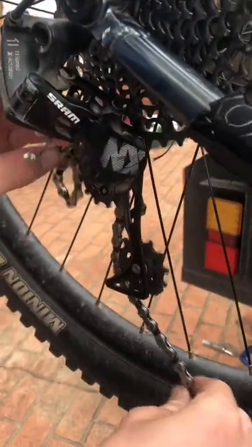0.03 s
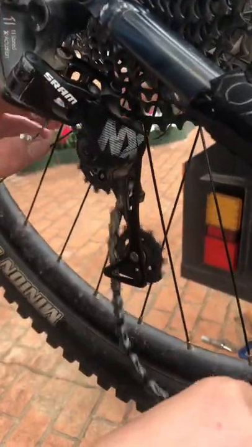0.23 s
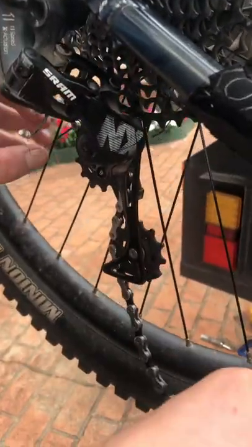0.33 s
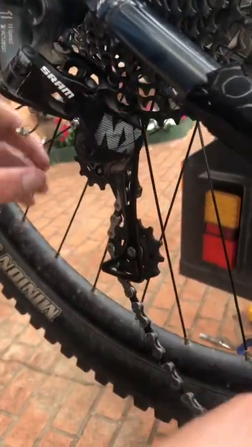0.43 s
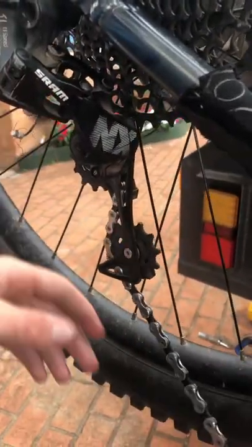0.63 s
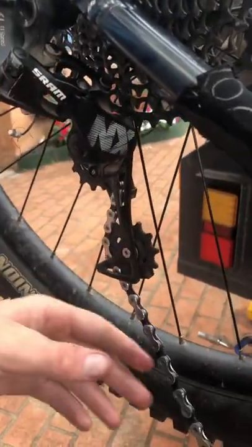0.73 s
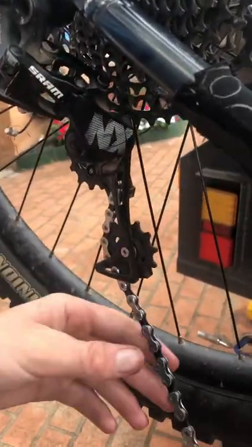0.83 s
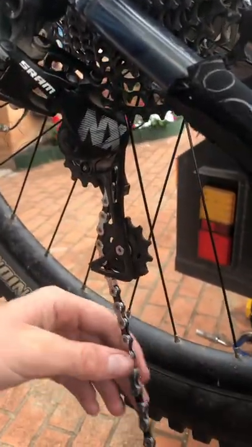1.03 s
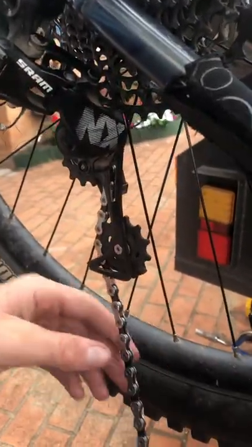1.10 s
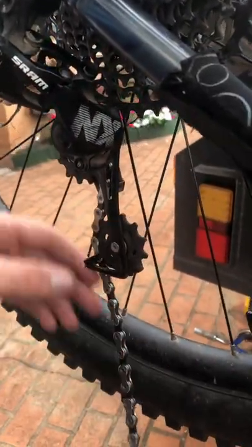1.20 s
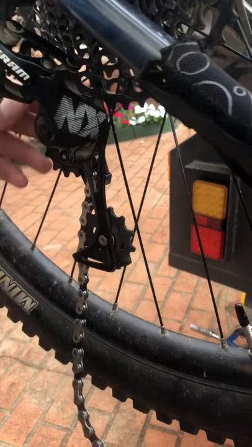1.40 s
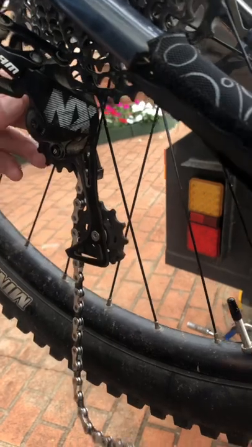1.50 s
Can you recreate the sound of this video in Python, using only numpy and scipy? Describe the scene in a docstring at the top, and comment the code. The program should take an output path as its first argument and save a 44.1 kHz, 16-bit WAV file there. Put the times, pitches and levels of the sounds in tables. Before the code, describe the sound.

Bicycle chain being handled, with one sharp metallic snap and light rattling over a faint hum.

```python
"""Paved yard, close by: a loose bicycle chain is handled at the rear derailleur.
Links clink twice on a sprocket and snap hard against the metal: a crack, then short steel modes.
The free chain slides (dense tiny contacts), ticks and clinks faintly; fingers scuff.
Each contact rings the sprockets and echoes weakly off bicycle, paving and walls.
Underneath: steady hum, wavering drone, low outdoor rumble, faint hiss."""
import sys
import numpy as np
from scipy import signal
from scipy.fft import rfft, irfft, next_fast_len
from scipy.io import wavfile
from scipy.ndimage import uniform_filter1d

SR = 44100
rng = np.random.default_rng(int(sys.argv[2]) if len(sys.argv) > 2 else 0)


def output_pcm(signal):
    """Save a mono or channel-first signal as 16-bit PCM at the path in sys.argv[1].

    Samples are clipped to [-1, 1] before scaling.
    """
    pcm = np.clip(np.atleast_2d(signal).T, -1, 1) * 32767
    wavfile.write(sys.argv[1], SR, np.round(pcm).astype(np.int16))


N = 68355
T = np.arange(N) / SR
RING_T = T[:6000]

# hum partials: f/Hz, rms level/dB
HUM_PARTIALS = [(99.9, -47.5), (200, -71.5)]
# drone envelope: t/s, rms level/dB
DRONE_ENVELOPE = [(0, -60), (.3, -59.5), (.95, -58), (1.25, -57), (1.33, -63), (1.55, -67.5)]
# noise and click spectra: f/Hz, relative density/dB
RUMBLE_SPECTRUM = [(20, -31.5), (30, -16), (43, 1), (80, 1), (170, 2), (260, -1), (350, -2.5), (420, -9),
                   (600, -43.5)]
HISS_SPECTRUM = [(240, -20.5), (400, -6), (550, 0.5), (860, -8.5), (1200, -7.5), (1600, -15), (2060, -13),
                 (2630, -18.5), (3700, -17.5), (4400, -20.5), (8000, -25.5), (12000, -29), (15600, -31.5),
                 (16000, -56)]
SLIDE_SPECTRUM = [(400, -4.5), (1100, -2), (2050, 2), (2700, -1), (3600, 0), (4050, -4), (4800, -7.5),
                  (5500, -5), (6450, 0.5), (7200, -7.5), (8100, -0.5), (8900, -15), (9800, -4.5),
                  (10700, -8), (11500, -14.5), (12600, -17), (13500, -7), (14300, -13.5), (15500, -7),
                  (16100, -31)]
TICK_SPECTRUM = [(300, -28.5), (1000, -3.5), (2200, -3.5), (4000, -4.5), (8000, -4), (12000, -4.5),
                 (15400, -5), (16600, -42)]
CRACK_SPECTRUM = [(300, -56.5), (1000, -35), (2500, -28.5), (4000, -14.5), (5000, -15), (6400, -11.5),
                  (7500, -9), (10000, 3.5), (12000, -3), (15000, 4.5), (16500, -3.5)]
CLATTER_SPECTRUM = [(300, -13.5), (1000, -16), (1500, -11), (2000, -0.5), (2500, -7.5), (4500, -0.5),
                    (6300, -5), (8000, -5), (9000, -20), (11000, 2), (12000, -7.5), (15200, -3.5),
                    (16000, -11.5)]
# chain slides: peak t/s, rise/s, fall/s, level/dB, tilt/(dB/oct), resonance f/Hz, boost/dB
SLIDE_EVENTS = [(.02, .042, 0.074, -66.5, -3.5, 2970, 3), (.119, .006, 0.017, -58, 8, 8400, 8),
                (0.139, 0.027, 0.052, -55, -4.5, 2440, 6), (0.516, 0.0045, 0.0052, -56, 1.5, 4240, 8),
                (.533, 0.054, 0.047, -57, 0, 13600, 5), (0.586, 0.0055, 0.0083, -61, -5.5, 2130, 5),
                (.915, 0.023, 0.017, -67, 3.5, 3300, 1), (.984, 0.045, 0.065, -67, 4, 9370, 1.5),
                (1.222, 0.021, 0.013, -61.5, -0.5, 15200, 12), (1.25, 0.011, 0.014, -60, 1, 9700, 4),
                (1.3, 0.015, .025, -69, 4, 4400, 10), (1.44, 0.034, 0.035, -64.5, 0.5, 5060, 6),
                (1.54, 0.0085, .023, -63.5, 1.5, 4080, 9)]
# single-link ticks: t/s, level/dB, tilt/(dB/oct), t60/s, resonance f/Hz, boost/dB
TICK_EVENTS = [(.0346, -38.5, 1.5, 0.0018, 15100, 4), (.0399, -39.5, -3, 0.0031, 6500, 6),
               (.044, -46, 2, .003, 13000, 0), (.0528, -44, 2, .003, 15000, 7),
               (0.0707, -40.5, 2.5, 0.013, 11500, -2), (.1222, -33.5, -5.5, 0.021, 2070, 4),
               (.1484, -40, 3, 0.0079, 10500, 1), (0.176, -34, -9.5, 0.0068, 4800, 7.5),
               (0.1948, -41, 0, .003, 15000, 1), (0.5245, -49, -5, .006, 13500, 5),
               (.5410, -31, 0, 0.018, 7700, 7), (.5490, -34.5, -4, 0.0039, 2140, 9.5),
               (.575, -47, 3, .004, 9900, 9), (.582, -40.5, 1, 0.012, 13400, -3),
               (.5933, -37.5, 4, .012, 13100, 9), (0.867, -46.5, 4, .003, 7500, 7),
               (.968, -44, 4.5, .007, 8800, 0), (0.9796, -42.5, 2, 0.0029, 8300, 7),
               (1.0644, -43.5, 2.5, 0.0055, 6330, 10.5), (1.232, -41.5, -3, 0.0086, 14400, 12),
               (1.2456, -41.5, -3.5, 0.008, 9700, 9), (1.3686, -43, -2, 0.0052, 5500, 12),
               (1.3709, -41, -4, 0.0062, 2940, 14), (1.4748, -44, -2, .0026, 9300, 9)]
# link on sprocket: t/s, level/dB, t60 factor
CLINK_EVENTS = [(0.2142, -32.5, 1.05), (.2254, -39.5, 1.65), (0.5235, -50, .7), (0.541, -46.5, 0.9)]
# snap strike (two rows at the same instant add up), then a bounce: t/s, level/dB
SNAP_STRIKES = [(0.236, 4), (0.236, -9), (0.238, -9.5)]
# finger scuffs: t/s, half length/s, centre f/Hz, level/dB
SCUFF_EVENTS = [(0.831, 0.016, 2880, -63.5), (0.918, 0.024, 3100, -63), (1.307, 0.034, 3440, -65.5),
                (1.326, 0.036, 1150, -67), (1.335, 0.0074, 2650, -67)]
# steel modes: f/Hz, relative level/dB, t60/s
CLINK_MODES = [(1190, -21, 0.028), (1967, -12, .04), (2335, -9.5, 0.06), (3310, -12.5, 0.026),
               (4030, -11.5, 0.022), (4460, -14.5, 0.049), (5240, -7.5, 0.037), (6540, -5.5, 0.018),
               (7800, -16, .018), (7980, -2, 0.025), (9820, -15, 0.04), (13550, -25, .03)]
SNAP_RING_MODES = [(1207, -30.5, .06), (1996, -16.5, 0.036), (2950, -17, 0.029), (4060, -24.5, 0.013),
                   (5335, -3, 0.019), (7400, -4, 0.026), (7810, 3.5, 0.025), (8040, -2, 0.019),
                   (9600, -7.5, 0.0126), (9780, -6.5, 0.023), (10050, -15, .012), (11220, -11, .013),
                   (11330, -10, 0.033), (12710, -7.5, 0.014), (13200, -13.5, .022), (14320, -14, .011),
                   (15260, -6, .018)]
SPROCKET_RING_MODES = [(1050, -7, 0.088), (1218, 0, .2), (1383, 3, 0.072), (1830, -6.5, 0.0593),
                       (1984, -6, 0.058), (2380, -13, 0.053)]
# echo response: f/Hz, gain/dB
ECHO_RESPONSE = [(300, -16), (1200, 7.5), (2200, 8.5), (5000, -5), (8000, -12.5), (11000, -6),
                 (15500, -11.5), (16200, -33)]


def amp(db):
    """dB to gain."""
    return 10 ** (np.asarray(db) / 20)


def unit_rms(x):
    """Scale to rms 1."""
    return x / np.sqrt(np.mean(x ** 2) + 1e-20)


def add(mix, start_s, sound):
    """Mix in at start_s."""
    part = mix[max(round(start_s * SR), 0):][:len(sound)]
    part += sound[:len(part)]


def colour(x, spectrum, tilt_db_oct=0, peak_hz=1000, boost_db=0, width_oct=.16):
    """Minimum-phase filter: spectrum, tilt above 2 kHz, one optional resonance."""
    size = next_fast_len(len(x) + 4096)
    hz = abs(np.fft.fftfreq(size, 1 / SR)) + 1
    knots_hz, knots_db = np.transpose(spectrum)
    db = np.interp(np.log(hz), np.log(knots_hz), knots_db)
    db += tilt_db_oct * np.log2(np.maximum(hz, 2000) / 2000)
    db += boost_db / (1 + (np.log2(hz / peak_hz) / width_oct) ** 2)
    gain = np.exp(signal.hilbert(np.log(amp(db))).conj())
    return np.fft.ifft(np.fft.fft(x, size) * gain).real[:len(x)]


def noise(spectrum, size=len(RING_T)):
    """Coloured noise, rms 1."""
    return unit_rms(colour(rng.standard_normal(size), spectrum))


def patchy(x, depth_db, patch_hz=700, patch_s=.025):
    """Random gain patches in time and frequency; output rms 1."""
    frames = signal.stft(x, nperseg=256)[2]
    field = rng.standard_normal(frames.shape)
    field = uniform_filter1d(field, round(patch_hz * 256 / SR), axis=0)
    field = uniform_filter1d(field, round(patch_s * SR / 128), axis=1)
    frames *= amp(depth_db * unit_rms(field))
    return unit_rms(signal.istft(frames, nperseg=256)[1][:len(x)])


def decay(t60_s, t=RING_T):
    """Envelope, -60 dB at t60_s."""
    return np.exp(-np.log(1000) * t / t60_s)


def ring(modes, t60_factor=1):
    """Struck steel: damped sines of alternating sign."""
    return sum((-1) ** k * amp(db) * decay(t60_s * t60_factor) * np.sin(2 * np.pi * hz * RING_T)
               for k, (hz, db, t60_s) in enumerate(modes))


def sine(hz):
    """Sine of random phase, rms 1."""
    return np.sqrt(2) * np.sin(2 * np.pi * (hz * T + rng.random()))


def hum():
    """Steady low tone and its octave."""
    return sum(amp(db) * sine(hz) for hz, db in HUM_PARTIALS)


def drone(centre_hz=303.3, waver_rms_hz=1.46):
    """Higher tone; wavers in pitch, fades near the end."""
    waver = unit_rms(sum(sine(hz) for hz in np.geomspace(1, 8, 12)))
    phase = 2 * np.pi * np.cumsum(centre_hz + waver_rms_hz * waver) / SR
    level_db = np.interp(T, *np.transpose(DRONE_ENVELOPE))
    return amp(level_db) * np.sqrt(2) * np.sin(phase)


def outdoor_air(rumble_db=-58.5, hiss_db=-61):
    """Low rumble and faintly flickering hiss."""
    rumble = amp(rumble_db) * noise(RUMBLE_SPECTRUM, N)
    hiss = amp(hiss_db) * patchy(noise(HISS_SPECTRUM, N), depth_db=1.07)
    return rumble + hiss


def slides(grains_per_s=7000, spread_db=3.2):
    """Moving chain: dense tiny contacts swell and fade, one resonance per stretch."""
    sizes = amp(spread_db * np.minimum(rng.exponential(1, N), 4))
    signs = rng.choice([-1, 1], N)
    hits = rng.random(N) < grains_per_s / SR
    grains = patchy(sizes * signs * hits, depth_db=3.2)
    out = np.zeros(N)
    for t_s, rise_s, fall_s, db, tilt_db_oct, peak_hz, boost_db in SLIDE_EVENTS:
        swell = np.exp(-((T - t_s) / np.where(T < t_s, rise_s, fall_s)) ** 2)
        out += amp(db) * swell * unit_rms(colour(grains, SLIDE_SPECTRUM, tilt_db_oct, peak_hz, boost_db))
    return out


def sprocket_ring(contacts, gain_db=-51):
    """Sprockets ring faintly with every contact."""
    return amp(gain_db) * signal.fftconvolve(contacts, ring(SPROCKET_RING_MODES))[:N]


def reflections(x, gain_db, t60_s, delay_s):
    """Diffuse, decaying echoes."""
    t = T[:SR // 2]
    tail = rng.standard_normal(len(t)) * (t > delay_s) * decay(t60_s, t)
    return amp(gain_db) * signal.fftconvolve(x, tail / np.linalg.norm(tail))[:N]


def yard_echo(x):
    """Quick reflections off the bicycle, then a weak echo off paving and walls."""
    bicycle = reflections(x, gain_db=-16, t60_s=.026, delay_s=.002)
    yard = reflections(x, gain_db=-20, t60_s=.23, delay_s=.0094)
    return colour(bicycle + yard, ECHO_RESPONSE)


def ticks(tail_db=-11.5, spread_samples=6.8):
    """Single links settle: dry click, tiny rough tail, one resonance each."""
    out = np.zeros(N)
    for t_s, db, tilt_db_oct, t60_s, peak_hz, boost_db in TICK_EVENTS:
        tail = amp(tail_db) * decay(t60_s) * rng.standard_normal(len(RING_T))
        click = colour((RING_T == 0) + tail, TICK_SPECTRUM, tilt_db_oct, peak_hz, boost_db)
        spread_rms = np.sqrt(np.sum(click ** 2) / spread_samples)
        add(out, t_s, amp(db) * click / spread_rms)
    return out


def clinks(contact_db=-7, contact_t60_s=.022):
    """Links knock lightly on a sprocket and ring the chain."""
    out = np.zeros(N)
    for t_s, db, t60_factor in CLINK_EVENTS:
        contact = amp(contact_db) * decay(contact_t60_s) * noise(TICK_SPECTRUM)
        add(out, t_s, amp(db) * (ring(CLINK_MODES, t60_factor) + contact))
    return out


def snap(t_s=.2359, slip_s=.0005, slip_db=-18, ring_db=-20, clatter_db=-26, shiver_db=-52.5):
    """A link slips, cracks against the metal, bounces and rings; its neighbours shiver on."""
    slip_rise = np.exp(-abs(T - t_s) / slip_s) * (T < t_s)
    out = amp(slip_db) * slip_rise * noise(CRACK_SPECTRUM, N)
    crack = colour(1. * (RING_T == 0), CRACK_SPECTRUM)
    for strike_s, db in SNAP_STRIKES:
        add(out, strike_s, amp(db) * crack)
    clatter = amp(clatter_db) * decay(t60_s=.022) * noise(CLATTER_SPECTRUM)
    shiver = amp(shiver_db) * decay(t60_s=.2) * noise(TICK_SPECTRUM)
    add(out, t_s, amp(ring_db) * ring(SNAP_RING_MODES) + clatter + shiver)
    return out


def scuffs(width_oct=.19):
    """Fingers rub: brief narrow bands of noise."""
    out = np.zeros(N)
    hz = np.fft.rfftfreq(N, 1 / SR) + 1
    for t_s, half_s, centre_hz, db in SCUFF_EVENTS:
        band = 1 / (1 + (np.log2(hz / centre_hz) / width_oct) ** 2)
        rub = unit_rms(irfft(rfft(rng.standard_normal(N)) * band, N))
        out += amp(db) * np.exp(-((T - t_s) / half_s) ** 2) * rub
    return out


def scene():
    """Chain, sprockets and echo over the background; mono."""
    contacts = snap() + clinks() + ticks() + slides() + scuffs()
    direct = contacts + sprocket_ring(contacts)
    return (direct + yard_echo(direct) + hum() + drone() + outdoor_air())[None]


def record(dry):
    """Low-pass at 16.75 kHz."""
    lowpass = signal.firwin(255, 16750, window=("kaiser", 9), fs=SR)
    return signal.oaconvolve(dry, lowpass[None], "same")


dry = scene()
out = record(dry)
output_pcm(out)
```